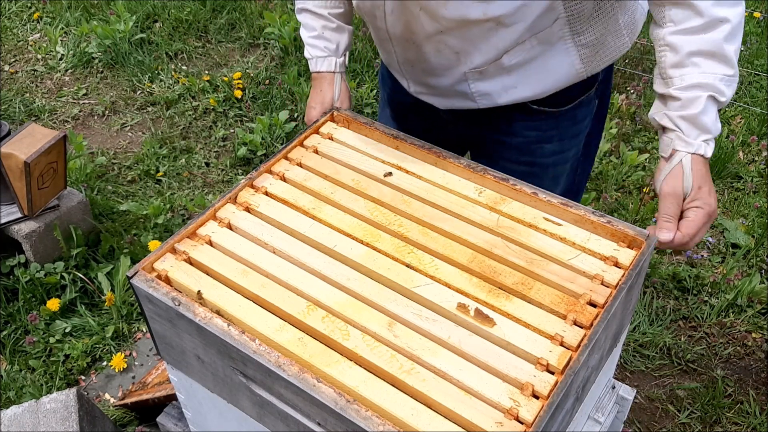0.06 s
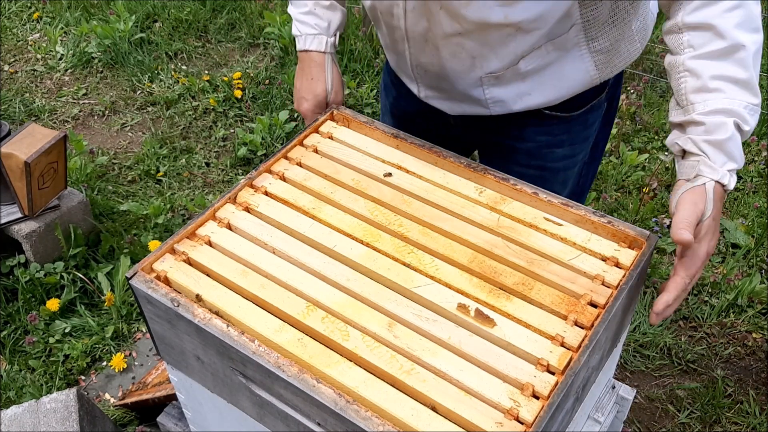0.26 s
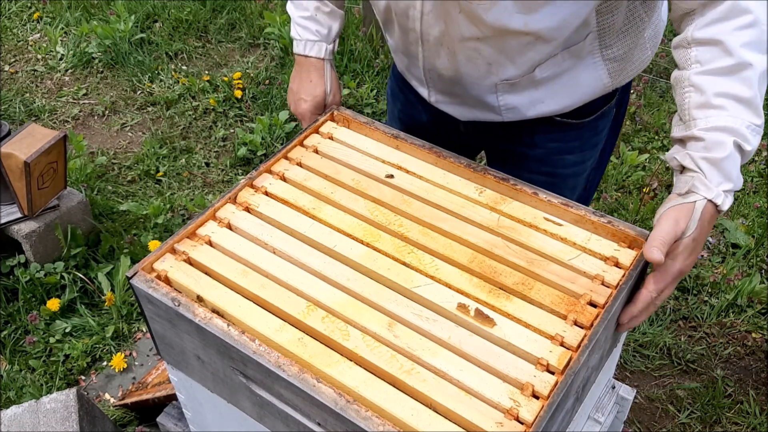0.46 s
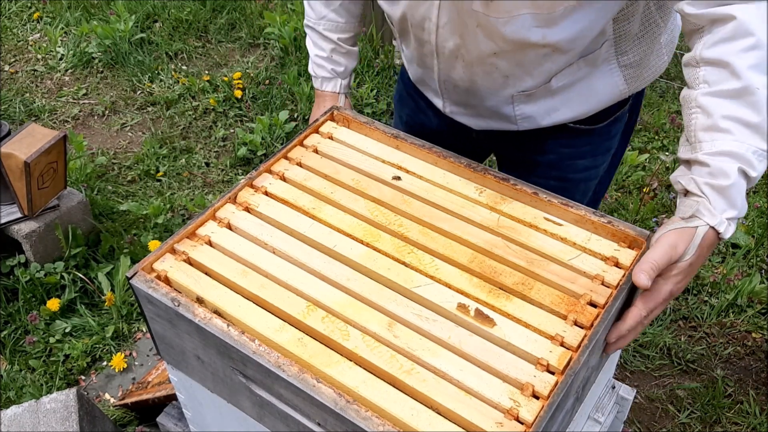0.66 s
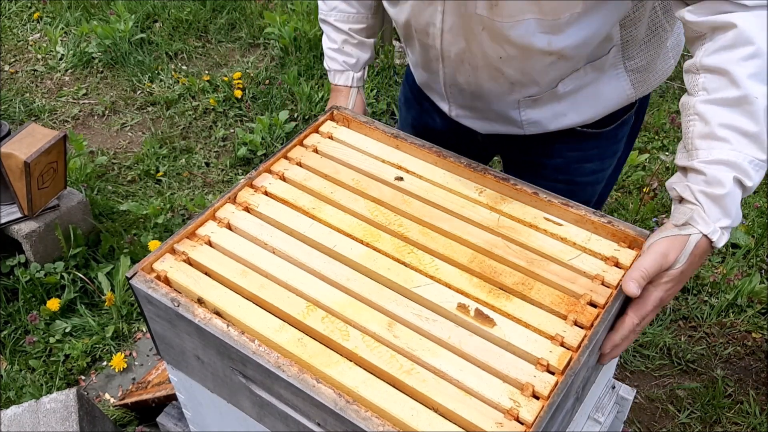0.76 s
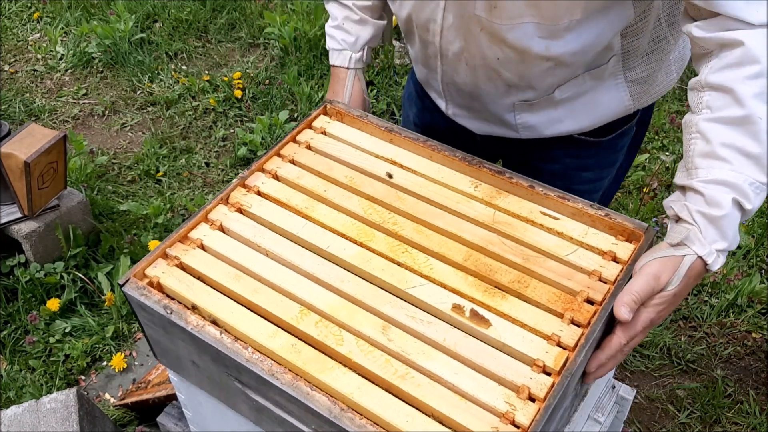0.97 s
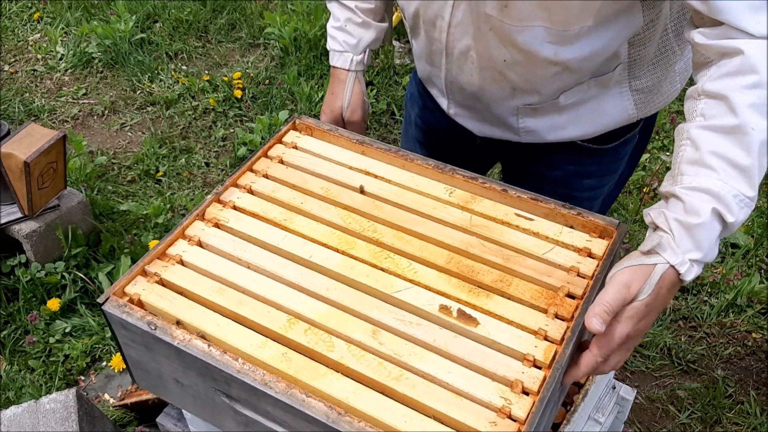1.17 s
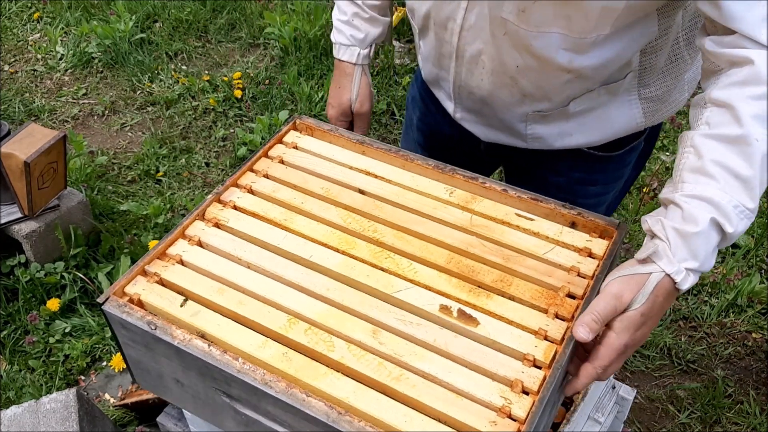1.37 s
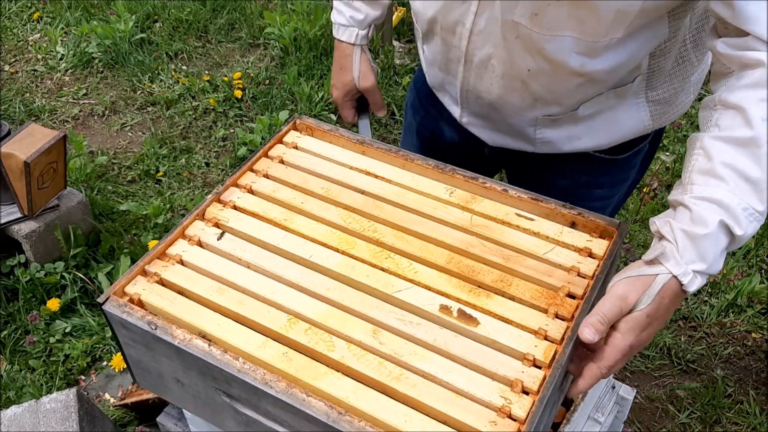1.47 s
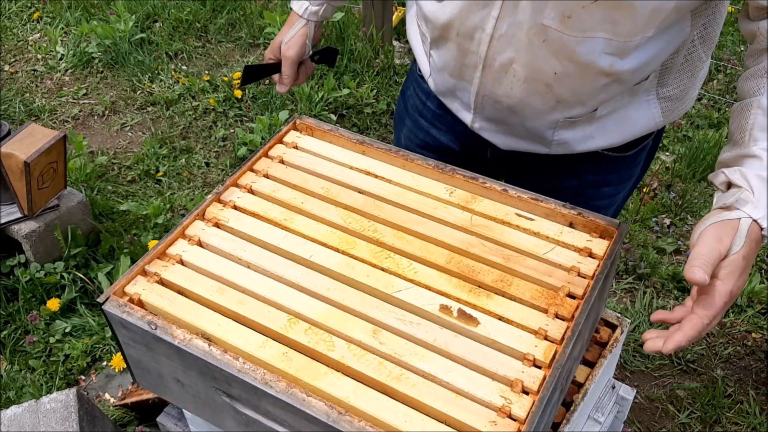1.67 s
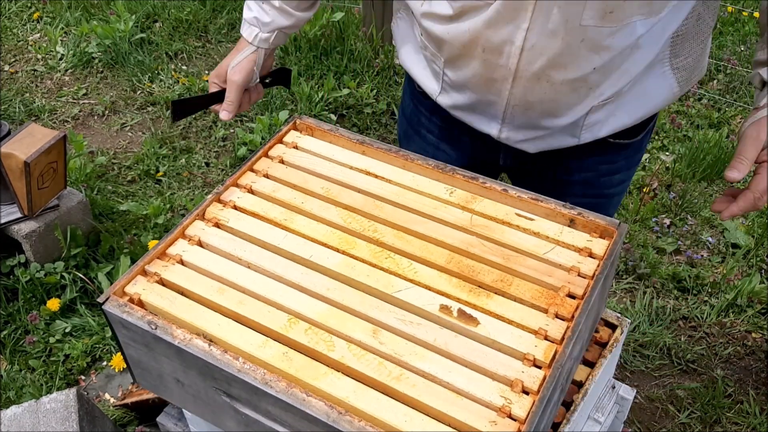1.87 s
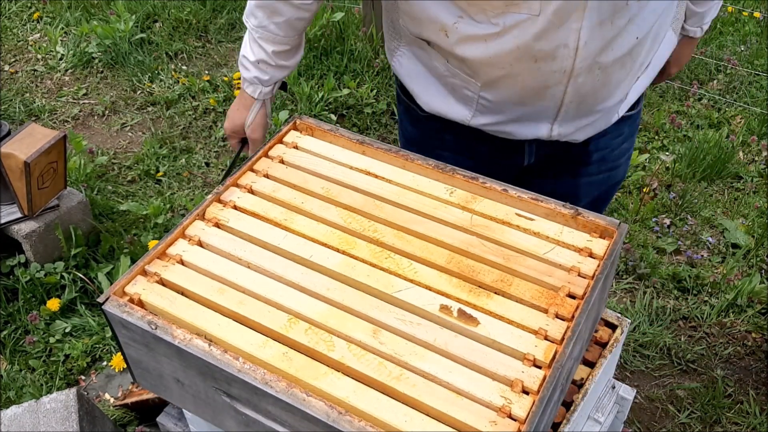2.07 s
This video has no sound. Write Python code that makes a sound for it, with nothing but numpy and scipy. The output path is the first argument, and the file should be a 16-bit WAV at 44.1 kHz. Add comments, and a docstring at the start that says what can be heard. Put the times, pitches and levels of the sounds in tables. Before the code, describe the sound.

Two sharp wooden cracks as a hive box is pried loose, then settles softly.

```python
"""Two loud wooden cracks, outdoors: a hive box is levered off the one below and its propolis seal lets go,
one corner and then another. Each crack is a quick run of slips that ring the boards, with small ticks
around it. The loosened box rubs, creaks and bumps softly on its seat, then settles on the lower rim.
Air buffets the microphone over a quiet hiss and a faint low hum."""
import sys
import numpy as np
from scipy import signal
from scipy.io import wavfile

SR = 44100
rng = np.random.default_rng(int(sys.argv[2]) if len(sys.argv) > 2 else 0)


def store_pcm(level_fs):
    """Save levels as 16-bit WAV."""
    pcm = np.round(np.clip(level_fs, -1, 1) * 32767).astype(np.int16)
    wavfile.write(sys.argv[1], SR, np.atleast_2d(pcm).T)


N = 92610
TIME = np.arange(N) / SR
BOX_PAN_DB, GRAINS_PER_S = -5.5, 2000   # every pan is left minus right; grains are tiny stick-slips

CLICK_DB, CLICK_TOP_HZ, CRACK_LOW_CUT_HZ = -9, 5950, 260   # the cracks carry little below CRACK_LOW_CUT_HZ
SNAP_DB, SNAP_T60_S = -3, (0.017, 0.0084)   # pairs are (first corner, second corner)
FRAMES_DB, LEFT_LATE_MS = (-16.5, -23), (0.06, -0.034)
FRAMES_T60_S, FRAMES_FALL = 0.087, 0.21   # t60 at 1 kHz, falling as a power of frequency
BOARD_T60_S, BOARD_FALL = 0.044, 0.32   # likewise
ECHO_S, ECHO_DB, ECHO_T60_S, ECHO_TILT_DB = 0.0125, -20, 0.043, -2   # off the ground and the keeper
YARD_DB, YARD_T60_S, YARD_TILT_DB = -36, 0.51, -4   # scatter from the surroundings; tilts are per octave
# Ringing tones of the boards: (frequency [Hz], level at first corner [dB], level at second corner [dB])
BOARD_TONES = [(448, -20, -54), (676, -17.5, -48), (916, -21.5, -19), (1098, -30.5, -22), (1186, -21, -38),
               (1562, -18.5, -30.5), (1856, -21.5, -26.5), (2043, -32, -15), (2292, -23, -50),
               (2390, -23, -20), (2590, -23, -47), (2980, -22, -42), (3830, -26, -19), (4620, -26, -11),
               (5370, -38, -11), (6130, -29, -25)]
# Dense ring of box and frames: (frequency [Hz], density at first corner [dB], change at second [dB])
WOOD_COLOUR = [(90, -25, 3), (306, -30, 11), (495, 2, -18.5), (974, -0.5, 2.5), (1300, -3.5, 2),
               (2270, -0.5, -0.5), (5940, -2, 1.5), (7600, 1, -3.5), (11650, -14.5, 2.5), (16000, -3.5, -7)]
# Slips of the seal and sharp wood contacts: (time [s], level [dB], brightness [dB/octave], low cut [Hz],
# pan [dB], board ring [dB], corner [0 first, 1 second])
SEAL_SLIPS = [(.1650, -35, -3.5, 1400, -10.5, 1, 0), (0.2004, -29.5, -2.5, 1500, -8, -3, 0),
              (0.2379, -22.5, 0.5, 1520, -14, -3, 0), (0.2409, -16, -0.5, 700, -5.5, 1.5, 0),
              (.2520, -9.5, -4, 1100, -13, -0.5, 0), (0.255, -10.5, 0.5, 700, -4, 1.5, 0),
              (0.256, -7.5, -0.5, 550, -4.5, -4, 0), (.2603, -8.5, -2.5, 397, -6, 3.5, 0),
              (0.3606, -18.5, -0.15, 2330, -5.5, 6.5, 0), (.927, -47.5, 5, 4970, -11, -7, 1),
              (0.9855, -15.5, 0, 6040, -15, 0, 1), (.9874, -10.5, 0, 4030, 14, -19, 1),
              (0.9891, -3, -2, 600, -3.5, 0.5, 1), (0.9918, -9.5, 1.5, 700, -11.5, -12.5, 1),
              (0.9986, -11.5, 0.5, 600, 3, -9, 1)]
def cracks():
    """Each slip clicks, snaps, rings the boards and frames, and scatters round the yard."""
    times, db, tilt_db, low_hz, pan_db, ring_db, corner = np.transpose(SEAL_SLIPS)
    second = corner > .5

    def force(hz):
        """Stereo strength of every slip at one frequency; small slips lack bass."""
        level = from_db(db + tilt_db * np.log2(max(hz, 300) / 2000))
        return level * pan(pan_db) / np.sqrt(1 + (low_hz / hz) ** 4)

    attacks = clicks(times, force(CLICK_TOP_HZ / 2))
    out = from_db(CLICK_DB) * butter(attacks, [CLICK_TOP_HZ / 10, CLICK_TOP_HZ], "band")
    wood = np.array(WOOD_COLOUR)
    for khz, noise in noise_bands(wood[:, :2]):
        corner_db = second * at_hz(wood[:, ::2], 1000 * khz)
        push = force(1000 * khz) * from_db(corner_db)
        powers = [clicks(times, push * here) ** 2 for here in (~second, second)]
        snap = from_db(SNAP_DB) ** 2 * sum(fade(p, t60) for p, t60 in zip(powers, SNAP_T60_S))
        frame_drive = sum(from_db(level_db) ** 2 * p for p, level_db in zip(powers, FRAMES_DB))
        frames = fade(frame_drive, FRAMES_T60_S / khz ** FRAMES_FALL)
        bounce = clicks(times + ECHO_S, push) ** 2
        echo = from_db(ECHO_DB + ECHO_TILT_DB * np.log2(khz)) ** 2 * fade(bounce, ECHO_T60_S)
        yard = from_db(YARD_DB + YARD_TILT_DB * np.log2(khz)) ** 2 * fade(sum(powers), YARD_T60_S)
        out += noise * np.sqrt(snap + frames + echo + yard)
    left_times = times + np.where(second, LEFT_LATE_MS[1], LEFT_LATE_MS[0]) / 1000
    for hz, first_db, second_db in BOARD_TONES:
        push = force(hz) * from_db(ring_db + np.where(second, second_db, first_db))
        strikes = np.array([clicks(left_times, push)[0], clicks(times, push)[1]])
        out += ring(strikes, hz, BOARD_T60_S / (hz / 1000) ** BOARD_FALL)
    return butter(out, CRACK_LOW_CUT_HZ, "high")


# Low body of the whole box: (frequency [Hz], t60 [s], level [dB])
BOX_BODY = [(89, 0.066, -17), (139, 0.13, -1), (247, 0.096, -2), (312, 0.05, 0.5)]
# Soft thuds of the box on its seat: (time [s], level [dB])
SEAT_BUMPS = [(0.2721, -33.5), (.9990, -45), (1.0140, -37.5), (1.1946, -32), (1.2076, -32), (1.222, -38),
              (1.2347, -35), (1.2460, -33)]
def bumps(contact_hz=605):
    """The loosened box rocks and sounds its low modes; the soft contact passes little treble."""
    times, db = np.transpose(SEAT_BUMPS)
    pushes = butter(clicks(times, from_db(db) * pan(BOX_PAN_DB)), contact_hz, "low")
    return sum(from_db(mode_db) * ring(pushes, hz, t60) for hz, t60, mode_db in BOX_BODY)


# Ringing tones of the lower rim: (frequency [Hz], level [dB])
RIM_TONES = [(425, -1.5), (676, 2), (738, -0.5), (890, -1), (1136, -5), (1204, -5.5), (1528, -2.5),
             (1955, -8.5)]
def rim(force, t60=0.1):
    """The rim of the lower box rings when struck or rubbed, its modes alternating in polarity."""
    return sum((-1) ** k * from_db(db) * ring(force, hz, t60) for k, (hz, db) in enumerate(RIM_TONES))


# Taps as the box sets down: (time [s], level [dB])
RIM_TAPS = [(1.2275, -52), (1.2465, -45)]
def settling():
    """The box comes down on the rim below: a light touch, then a firm one."""
    times, db = np.transpose(RIM_TAPS)
    return rim(clicks(times, from_db(db) * pan(BOX_PAN_DB)))


# Colour of wood sliding on wood: (frequency [Hz], density [dB])
RUB_COLOUR = [(130, -3.5), (240, 21.5), (450, -13), (800, -14), (1500, 5), (3000, -4.5), (7000, -8),
              (16000, -24)]
# Slides: (peak time [s], half length [s], level [dB], brightness [dB/octave], rim ring [dB])
RUB_STROKES = [(0.296, 0.016, -52, 2, 3.5), (0.703, 0.042, -54.5, 1.5, -14), (1.018, 0.025, -49, -5.5, 4),
               (1.095, 0.022, -49, 1, -4.5), (1.2, 0.028, -48.5, 0, -23), (1.253, 0.03, -49, -3.5, -2.5),
               (0.978, 0.012, -52, 4.5, -19)]
def rubs():
    """Wood slides briefly on wood: grainy friction noise that also rings the rim."""
    strokes = [(from_db(db) * swell(s, half_s), tilt, ring_db)
               for s, half_s, db, tilt, ring_db in RUB_STROKES]
    grains = (rng.random(N) < GRAINS_PER_S / SR) * rng.standard_normal(N)
    grit = rms_one(np.sqrt(fade(grains ** 2, t60=0.026)))
    friction = sum(noise * sum(envelope * from_db(tilt * np.log2(khz)) for envelope, tilt, _ in strokes)
                   for khz, noise in noise_bands(RUB_COLOUR))
    rim_level = sum(envelope * from_db(ring_db) for envelope, _, ring_db in strokes)
    return pan(BOX_PAN_DB) * (grit * friction + rim_level * rms_one(rim(grains)))


# A short creak: (peak time [s], half length [s], resonance [Hz], t60 [s], level [dB])
CREAK_TONES = [(1.087, 0.0099, 2800, 0.0062, -51), (1.101, 0.029, 237.2, .15, -42.5)]
def creak():
    """As the box shifts, tiny sticks and slips excite a high and a low resonance of the wood."""
    grains = (rng.random(N) < GRAINS_PER_S / SR) * rng.choice([-1, 1], N)
    return pan(BOX_PAN_DB) * sum(from_db(db) * swell(s, half_s) * rough_tone(grains, hz, t60)
                                 for s, half_s, hz, t60, db in CREAK_TONES)


# Air buffeting the microphone: (peak time [s], half length [s], level [dB], pan [dB])
AIR_PUFFS = [(0.123, 0.02, -42.5, -13.5), (0.188, 0.011, -35.5, -9.5), (0.379, 0.015, -36, -20),
             (0.437, 0.02, -41.5, -20.5), (0.695, 0.055, -47.5, -13.5), (0.883, 0.029, -41, -2.5),
             (1.003, 0.011, -40.5, 18)]
def puffs(band_hz=(42, 119), top_hz=135):
    """Low lumps of moving air, different at each microphone port."""
    rumble = butter(rng.standard_normal((2, N)), band_hz, "band")
    rumble = rms_one(butter(rumble, top_hz, "low"))
    return rumble * sum(from_db(db) * pan(pan_db) * swell(s, half_s) for s, half_s, db, pan_db in AIR_PUFFS)


# Colour of the outdoor hiss: (frequency [Hz], density [dB])
HISS_COLOUR = [(30, -19), (55, -0.5), (90, 4), (130, -8.5), (190, -5.5), (280, -19), (410, -9),
               (650, -14.5), (1500, -18.5), (2200, -24), (7000, -28), (11000, -37), (16000, -26)]
# The hiss swells and sinks: (time [s], level change [dB])
HISS_RIDE = [(0, 1.5), (1.1, 2), (1.5, -1.2), (2.1, -0.7)]
# Tones of the hum: (frequency [Hz], t60 [s], level [dB])
HUM_TONES = [(399, 0.057, -62), (1530, 0.02, -68)]
def background(hiss_db=-50.5, pan_db=-6.5):
    """A bed of outdoor hiss and a faint, rough hum."""
    hum = sum(from_db(db) * rough_tone(rng.standard_normal(N), hz, t60) for hz, t60, db in HUM_TONES)
    level = from_db(hiss_db + np.interp(TIME, *np.transpose(HISS_RIDE)))
    hiss = level * sum(noise for _, noise in noise_bands(HISS_COLOUR))
    return pan(pan_db) * (hiss + hum)


BAND_EDGES_HZ = np.append(np.geomspace(28, 8000, 17), [10000, 12500, 16500])
# Stereo image of the banded noise: (frequency [Hz], left-right correlation [0 wide, 1 mono])
STEREO_IMAGE = [(40, 0.36), (150, 1), (500, 0.69), (1200, 0.081), (2500, 0.18), (5000, 0), (14000, 0.27)]
def noise_bands(spectrum):
    """Yield (kHz, stereo noise) per band; together they have the spectrum's shape and about unit rms."""
    white = rng.standard_normal((2, 2, N))
    centres = np.sqrt(BAND_EDGES_HZ[1:] * BAND_EDGES_HZ[:-1])
    gains = from_db(at_hz(spectrum, centres)) * np.sqrt(np.diff(BAND_EDGES_HZ))
    for k, (hz, gain) in enumerate(zip(centres, gains / np.linalg.norm(gains))):
        mid, side = butter(white[k % 2], BAND_EDGES_HZ[k:k + 2], "band")
        alike = at_hz(STEREO_IMAGE, hz)
        stereo = np.sqrt(1 + alike) * mid + np.sqrt(1 - alike) * side * [[1], [-1]]
        yield hz / 1000, gain * rms_one(stereo)


def from_db(db):
    """Decibels to gain."""
    return 10 ** (np.asarray(db) / 20)


def rms_one(x):
    """Scale to unit rms."""
    return x / np.sqrt(np.mean(x ** 2) + 1e-20)


def at_hz(points, hz):
    """Read a table on a log-frequency axis."""
    freqs, values = np.transpose(points)
    return np.interp(np.log(hz), np.log(freqs), values)


def pan(db):
    """Left and right gains for a level difference."""
    return from_db(np.array([[.5], [-.5]]) * db)


def butter(x, hz, kind):
    """Second-order Butterworth filter."""
    return signal.sosfilt(signal.butter(2, hz, kind, fs=SR, output="sos"), x + 1e-18)


def clicks(times, gains):
    """Stereo impulses at the given times."""
    out = np.zeros((2, N))
    for s, gain in zip(times, gains.T):
        out[:, int(s * SR)] += gain
    return out


def ring(x, hz, t60):
    """One mode: a unit click starts a dying sine of height 1."""
    radius, angle = from_db(-60 / (t60 * SR)), 2 * np.pi * hz / SR
    return signal.lfilter([0, np.sin(angle)], [1, -2 * radius * np.cos(angle), radius ** 2], x + 1e-18)


def rough_tone(drive, hz, t60):
    """A noisily driven resonance at unit rms, with the lows trimmed."""
    return rms_one(butter(ring(drive, hz, t60), hz / 2, "high"))


def fade(power, t60):
    """Energy that dies away after each impulse."""
    return signal.lfilter([1], [1, -10 ** (-6 / (t60 * SR))], power + 1e-18)


def swell(s, half_s):
    """A bell-shaped rise and fall."""
    return np.exp(-.5 * ((TIME - s) / half_s) ** 2)


def scene():
    """The box and the air around it."""
    return cracks() + bumps() + settling() + rubs() + creak() + puffs() + background()


NOTCH_HZ, NOTCH_WIDTH_HZ, NOTCH_DB = 8820, 2130, -20
LOW_CUT_HZ, HIGH_CUT_HZ = 15, 16000
def record(dry):
    """The microphone has a broad treble hollow and no deep bass; peaks are rounded and the top is cut."""
    b, a = signal.iirpeak(NOTCH_HZ, NOTCH_HZ / NOTCH_WIDTH_HZ, fs=SR)
    x = butter(dry, LOW_CUT_HZ, "high")
    for _ in range(2):
        x = x - (1 - from_db(NOTCH_DB / 2)) * signal.lfilter(b, a, x)
    rounded = x / (1 + (x / .9) ** 4) ** .25
    return signal.sosfilt(signal.ellip(10, .1, 70, HIGH_CUT_HZ, fs=SR, output="sos"), rounded)


dry = scene()
out = record(dry)
store_pcm(out)
```